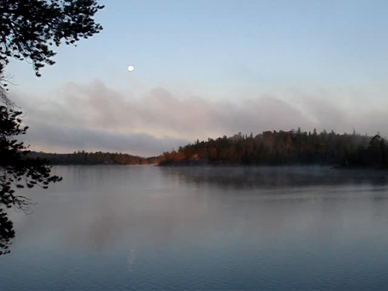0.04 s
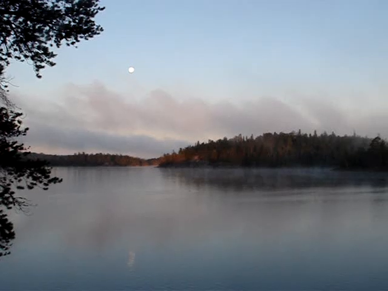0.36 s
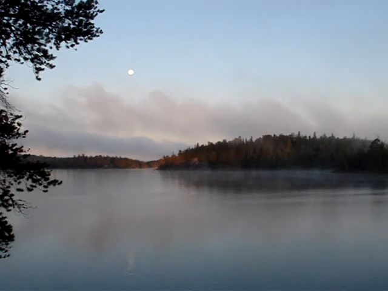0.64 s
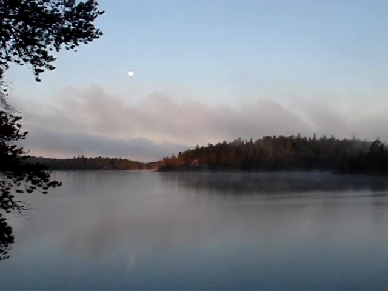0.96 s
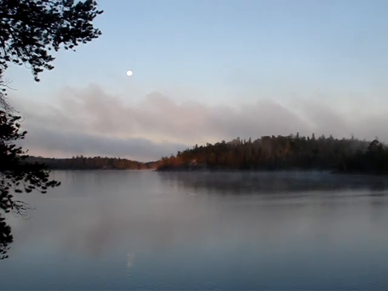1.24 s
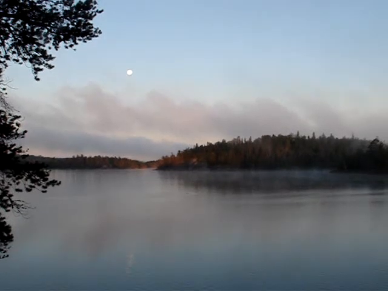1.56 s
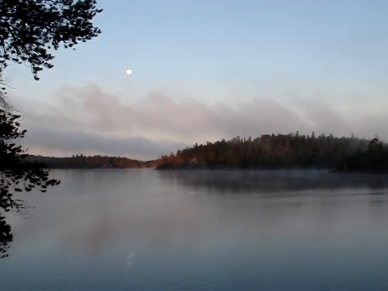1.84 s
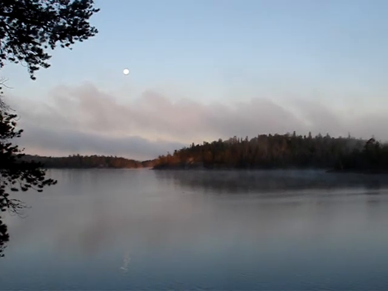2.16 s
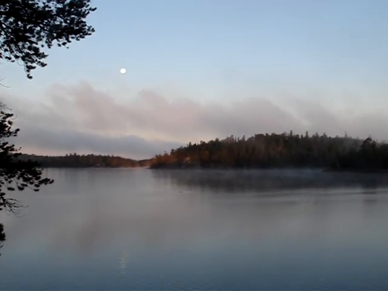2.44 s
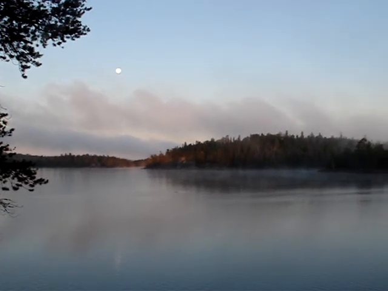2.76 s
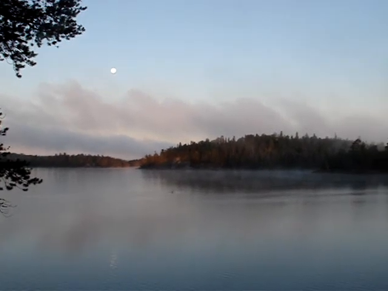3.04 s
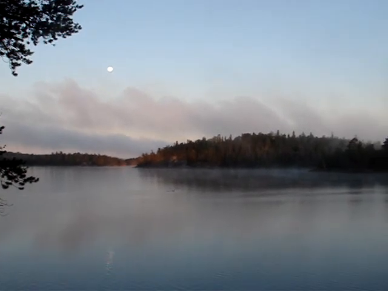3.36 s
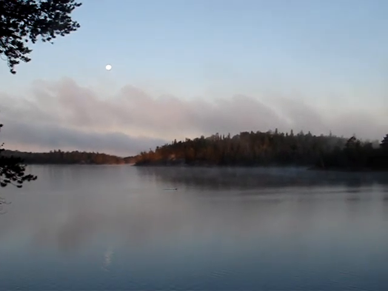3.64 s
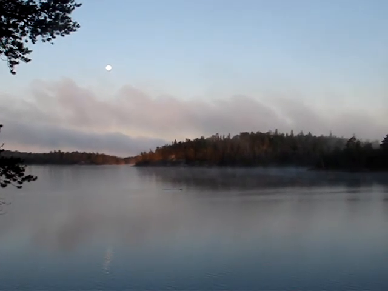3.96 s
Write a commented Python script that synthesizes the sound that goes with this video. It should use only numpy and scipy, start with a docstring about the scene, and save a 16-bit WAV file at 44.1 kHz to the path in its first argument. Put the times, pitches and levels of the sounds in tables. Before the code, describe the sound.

A loon starts a wavering call over a calm lake after faint hum and hiss.

```python
"""A calm lake at dusk. A camera's motor hums faintly over microphone hiss, driving the resonances of
its case; handling adds a few ticks (impacts) and scuffs (friction). Near the end a loon starts its
tremolo out on the water: a short grace note, then a nearly pure tone, modulated in pitch and level
eleven times a second, that breaks into a higher register. The wooded shore returns a faint echo."""
import sys
import numpy as np
from scipy import signal
from scipy.fft import rfft, irfft
from scipy.io import wavfile

SR = 44100
rng = np.random.default_rng(int(sys.argv[2]) if len(sys.argv) > 2 else 0)


def generate_wav(sig):
    """Save sig (samples, or channels by samples) to the path in sys.argv[1] as 16-bit PCM at SR."""
    pcm = np.round(np.clip(np.atleast_2d(sig).T, -1, 1) * 32767).astype(np.int16)
    wavfile.write(sys.argv[1], SR, pcm)


N = 176400
TIME_S = np.arange(N) / SR
BINS_HZ = np.arange(N // 2 + 1) * SR / N


def from_db(db):
    """Amplitude ratio: a factor of ten for every 20 dB."""
    return 10 ** (np.asarray(db) / 20)

def in_time(points):
    """Linear interpolation of a curve at every sample."""
    return np.interp(TIME_S, *np.transpose(points))

def at_hz(points, hz):
    """Interpolation of a spectrum, in dB, on a log-frequency axis."""
    points_hz, db = np.transpose(points)
    return np.interp(np.log(hz + 1e-9), np.log(points_hz), db)

def noise(gain):
    """Spectral shaping: white noise weighted by a gain at each frequency, then scaled to rms 1."""
    shaped = irfft(rfft(rng.standard_normal(N)) * gain, N)
    return shaped / np.sqrt(np.mean(shaped ** 2) + 1e-20)

def drift(rate_hz):
    """Random modulation: low-passed noise of rms 1."""
    return noise(1 / (1 + (BINS_HZ / rate_hz) ** 2))

def resonance(hz, width_hz):
    """Lorentzian gain curve around a resonant frequency."""
    return 1 / (1 + ((BINS_HZ - hz) / (.78 * width_hz)) ** 2)

def swell(peak_s, rise_s, decay_s):
    """Transient envelope: a linear rise, then exponential decay."""
    t = TIME_S - peak_s
    return np.clip(1 + t / rise_s, 0, 1) * np.exp(-np.maximum(t, 0) / decay_s)

def phase_of(hz):
    """Phase as the time integral of frequency."""
    return 2 * np.pi * np.cumsum(hz) / SR


# Hiss spectrum: frequency_hz, relative_density_db
HISS_SPECTRUM = [(25, 1), (70, 1), (160, 5.5), (300, 6), (600, 7), (1000, 2), (1500, 3), (2600, 0),
                 (4000, -1.5), (5100, -1.5), (6500, -4.5), (8000, -5), (10000, -10.5)]
# Hiss envelope: time_s, level_db
HISS_ENVELOPE = [(.1, -57.5), (.7, -58), (1.2, -57.5), (1.6, -57.5), (2.3, -58), (2.9, -56.5), (3.4, -58),
                 (3.95, -57.5)]
def microphone_hiss():
    """Broadband noise of fixed spectrum and nearly steady level."""
    return from_db(in_time(HISS_ENVELOPE)) * noise(from_db(at_hz(HISS_SPECTRUM, BINS_HZ)))


# Rustle spectrum: frequency_hz, relative_density_db
RUSTLE_SPECTRUM = [(100, -20), (330, 7.5), (550, 1), (750, 5), (1100, 0.5), (2000, -2), (2900, -2),
                   (4000, -8), (6000, -14), (10000, -25.5)]
# Rustle envelope: time_s, level_db
RUSTLE_ENVELOPE = [(2.9, -67), (3.25, -58.5), (3.55, -53), (3.75, -50), (3.98, -52)]
def rustle():
    """Soft coloured noise under an amplitude envelope that grows towards the call."""
    return from_db(in_time(RUSTLE_ENVELOPE)) * noise(from_db(at_hz(RUSTLE_SPECTRUM, BINS_HZ)))


# Case resonances driven by the motor: centre_hz, width_hz, level_db
CASE_RESONANCES = [(284, 12, -71), (323.5, 22, -65.5), (389.5, 38, -65.5), (436.4, 17, -70),
                   (496, 45, -69.5), (717.3, 40, -64), (761.4, 33, -64), (880, 50, -69.5),
                   (910.4, 31.5, -64), (1043, 45, -72), (1147, 60, -69), (2034, 56, -70), (2135, 90, -73.5)]
# Changing strength of the low resonances: time_s, gain_db
LOW_WHIRR_GAIN = [(.1, 1.5), (1.1, 2), (1.5, -2), (1.57, 8.5), (1.64, -9.5), (1.8, -5.5), (1.92, 0.5),
                  (2.05, -7), (2.3, -5), (3.0, 0), (3.4, 2.5), (3.95, 1.5)]
# Motor tones: pitch_hz, level_db
MOTOR_TONES = [(393, -67), (721.4, -75), (904.4, -78), (1992, -79.5), (2056, -81.5), (7553, -85.5),
               (8317, -92)]
def camera_motor(low_below_hz=600, wobble=.003, flutter_db=1.98):
    """Forced vibration: the motor shakes the case's resonances and adds a few unsteady tones."""
    low_db = in_time(LOW_WHIRR_GAIN)
    whirr = sum(from_db(db + low_db * (hz < low_below_hz)) * noise(resonance(hz, width_hz))
                for hz, width_hz, db in CASE_RESONANCES)
    phase_per_hz = phase_of(1 + wobble * drift(5.96))
    tones = sum(from_db(db) * np.sqrt(2) * np.sin(hz * phase_per_hz) for hz, db in MOTOR_TONES)
    return (whirr + tones) * from_db(flutter_db * drift(12))


# Modes of the struck case: frequency_hz, gain_db, t60_s
CASE_MODES = [(970, -20.5, 0.011), (1410, -12.5, 0.01), (2580, -7, 0.006), (3150, -5, 0.0065),
              (3630, -7.5, 0.0041), (4470, -9, .004), (5830, -10, 0.0053), (7260, -10.5, 0.0032)]
# Impacts: start_s, level_db, centre_hz, falloff_db_per_octave
IMPACTS = [(.278, -38, 5200, 8), (.366, -37, 1500, 1.5), (.586, -31, 3100, -1), (1.632, -44, 2600, 12),
           (3.3055, -22, 2670, 15), (3.323, -33, 2900, 7), (3.5075, -27, 2200, 7)]
def handling_ticks(attack_s=.00051, scatter_db=1):
    """Damped free vibration: each impact rings the case's modes, with slightly random strengths."""
    out = np.zeros(N)
    age_s = np.arange(SR // 20) / SR
    hz, mode_db, t60_s = np.transpose(CASE_MODES)[:, :, None]
    for start_s, db, centre_hz, falloff in IMPACTS:
        level_db = db + mode_db - falloff * np.abs(np.log2(hz / centre_hz))
        level_db -= scatter_db * rng.standard_normal(hz.shape)
        decay = from_db(level_db - 60 * age_s / t60_s)
        rings = decay * np.sin(2 * np.pi * (hz * age_s + rng.random(hz.shape)))
        start = int(start_s * SR)
        out[start:start + len(age_s)] += 2 * rings.sum(0) * np.minimum(age_s / attack_s, 1)
    return out


def camera_bump():
    """A damped low resonance sounds as the strongest scuff nudges the camera."""
    thud = from_db(-55.5) * noise(resonance(hz=95, width_hz=70))
    return thud * swell(peak_s=3.03, rise_s=.014, decay_s=.024)


# Rubs: peak_s, level_db, rise_s, decay_s, centre_hz, emphasis_db, low_edge_hz, high_edge_hz
RUBS = [(0.28, -51, 0.0044, .006, 5160, 20, 1500, 8000), (.368, -46.5, 0.041, 0.0053, 1360, 7.5, 200, 6260),
        (2.635, -55.5, 0.065, 0.043, 3450, 9, 900, 8000),
        (3.021, -34.5, 0.0066, 0.019, 5800, 6.5, 900, 9350),
        (3.059, -43.5, .03, .044, 3540, 6.5, 900, 9000), (3.318, -46, 0.039, .011, 2900, 22, 1200, 6040),
        (3.44, -56, 0.034, 0.0065, 2400, 13, 900, 5000), (3.51, -46, .012, 0.02, 3030, 18, 400, 4200)]
def handling_scuffs(grain_db=2):
    """Friction noise: short, grainy, band-limited bursts, each with its own spectral peak."""
    out = np.zeros(N)
    for peak_s, db, rise_s, decay_s, centre_hz, emphasis_db, low_hz, high_hz in RUBS:
        emphasis = from_db(emphasis_db * resonance(centre_hz, centre_hz / 2))
        band = BINS_HZ / np.hypot(BINS_HZ, low_hz) / np.hypot(1, (BINS_HZ / high_hz) ** 2)
        grainy_gain = from_db(db + grain_db * drift(400))
        out += grainy_gain * noise(emphasis * band) * swell(peak_s, rise_s, decay_s)
    return out


def shore_echo(call, level_db=-18, t60_s=.9, delay_s=.025):
    """Diffuse scattering: trees round the lake return a delayed, exponentially dying echo."""
    response = rng.standard_normal(N) * (TIME_S > delay_s) * from_db(-60 * TIME_S / t60_s)
    return from_db(level_db) * signal.fftconvolve(call, response / np.linalg.norm(response))[:N]


# Grace note partials: harmonic_number, level_db
GRACE_HARMONICS = [(1, -37.5), (2, -40)]
def loon_grace_note(centre_s=3.594, length_s=.034, centre_hz=833, rise_hz_per_s=6500):
    """A linear chirp under a raised-cosine window: the short, low note that leads into the call."""
    t = np.clip(TIME_S - centre_s, -length_s / 2, length_s / 2)
    phase = phase_of(centre_hz + rise_hz_per_s * t)
    window = np.cos(np.pi * t / length_s) ** 2
    return window * sum(from_db(db) * np.sin(round(k) * phase) for k, db in GRACE_HARMONICS)


# Pitch at the crests of the waver: time_s, pitch_hz
WAVER_CRESTS = [(3.61, 1365), (3.635, 1335), (3.69, 1340), (3.716, 1410), (3.719, 1630), (3.8, 1684),
                (3.89, 1622), (3.98, 1603)]
# Fall in pitch between crests: time_s, depth_hz
WAVER_DIPS = [(3.66, 300.2), (3.753, 283), (3.843, 215.1), (3.935, 234)]
def loon_pitch(first_crest_s=3.6157, period_s=.0918, jitter=.003):
    """Frequency modulation: the pitch dips periodically from crests that leap to a higher register."""
    lift = np.abs(np.cos(np.pi * (TIME_S - first_crest_s) / period_s)) ** 1.8
    hz = in_time(WAVER_CRESTS) - in_time(WAVER_DIPS) * (1 - lift)
    return hz * (1 + jitter * drift(250))


# Swells of the fundamental: peak_s, rise_s, fall_s, level_db
TONE_SWELLS = [(3.619, 0.017, .014, -25.5), (3.709, 0.017, 0.0094, -19.5), (3.724, 0.0059, 0.0086, -27),
               (3.804, .027, 0.013, -18.5), (3.892, 0.025, 0.016, -21), (3.985, 0.025, 0.013, -21)]
def loon_amplitude(floor_db=-34.5):
    """Amplitude modulation: round-topped swells rise from a quiet floor near the pitch crests."""
    amplitude = from_db(floor_db)
    for peak_s, rise_s, fall_s, db in TONE_SWELLS:
        away_s = np.abs(TIME_S - peak_s)
        taper = np.where(TIME_S < peak_s, (away_s / rise_s) ** 2.55, (away_s / fall_s) ** 2.5)
        amplitude = amplitude + from_db(db) * np.exp(-taper)
    return amplitude


# Resonance curve of the throat: frequency_hz, gain_db
THROAT_RESPONSE = [(3200, -15), (3550, -2.5), (3750, 2), (4050, -11.5), (4250, -6.5), (4480, 0.5),
                   (4700, -12), (4950, -18.5), (5200, 1.5), (5500, -12.5), (7000, -19)]
# Envelope of the upper overtones: time_s, level_db
OVERTONE_ENVELOPE = [(3.625, -52), (3.645, -55), (3.665, -60), (3.685, -42.5), (3.705, -51), (3.735, -44),
                     (3.77, -41), (3.81, -58), (3.87, -49.5), (3.915, -53), (3.96, -48.5)]
# Upper overtones: harmonic_number, low_register_db, high_register_db
OVERTONES = [(3, -1.5, -1.5), (4, -5.5, -18.5)]
def loon_tremolo(start_s=3.605, attack_s=.0083, break_s=3.7175, break_width_s=.0017,
                 break_loss_db=14, rasp_db=-24.5, octave_db=-43, flicker_db=2.5):
    """Source and filter: a wavering tone's weak overtones sweep through the throat's resonances."""
    phase = phase_of(loon_pitch())
    amplitude = loon_amplitude()
    # Narrow-band noise around the fundamental roughens the tone.
    rasp = from_db(rasp_db) * (drift(300) * np.sin(phase) + drift(300) * np.cos(phase))
    octave = from_db(octave_db) * amplitude ** .56 * np.sin(2 * phase)  # swells less than the tone
    voice = amplitude * (np.sin(phase) + rasp) + octave
    envelope_db = in_time(OVERTONE_ENVELOPE)
    for k, low_db, high_db in OVERTONES:
        register_db = np.where(TIME_S < break_s, low_db, high_db)
        overtone_phase = round(k) * phase
        overtone_hz = np.diff(overtone_phase, prepend=0) * SR / (2 * np.pi)
        level_db = envelope_db + register_db + at_hz(THROAT_RESPONSE, overtone_hz)
        voice += from_db(level_db + flicker_db * drift(120)) * np.sin(overtone_phase)
    onset = np.clip((TIME_S - start_s) / attack_s, 0, 1)
    # The voice falters at the change of register.
    falter_db = break_loss_db * np.exp(-((TIME_S - break_s) / break_width_s) ** 2)
    return voice * onset * from_db(-falter_db)


def scene():
    """Superposition: the loon and its echo add to the small sounds near the camera."""
    loon = loon_grace_note() + loon_tremolo()
    echo = shore_echo(loon)
    background = camera_motor() + microphone_hiss() + rustle()
    handling = handling_ticks() + camera_bump() + handling_scuffs()
    return (background + handling + echo + loon)[None]

def record(dry, start_s=.076, fade_s=.0074, cutoff_hz=10100):
    """Band limiting: after a quick fade-in, a steep low-pass filter removes the highest treble."""
    fade_in = np.clip((TIME_S - start_s) / fade_s, 0, 1)
    low_pass = signal.ellip(12, .1, 70, cutoff_hz, fs=SR, output="sos")
    return signal.sosfilt(low_pass, dry * fade_in)


dry = scene()
out = record(dry)
generate_wav(out)
```